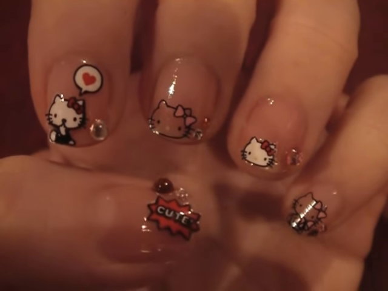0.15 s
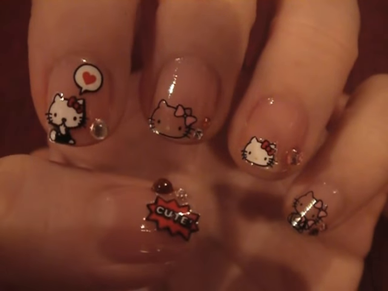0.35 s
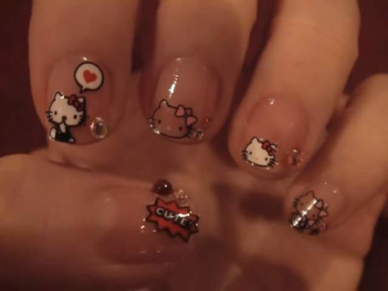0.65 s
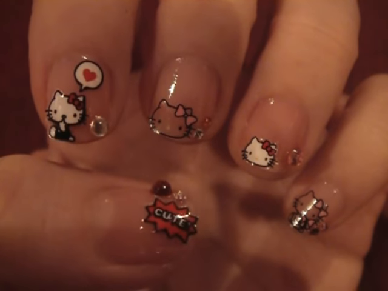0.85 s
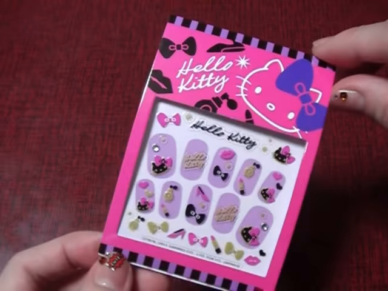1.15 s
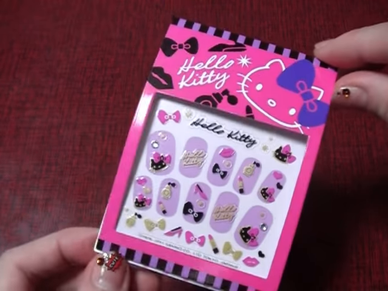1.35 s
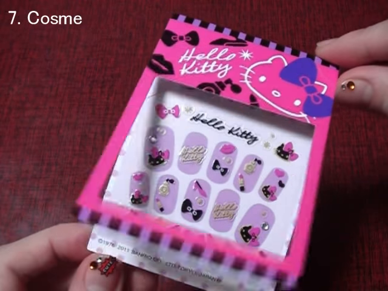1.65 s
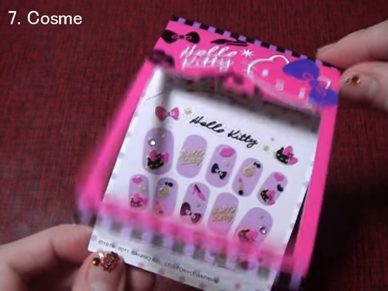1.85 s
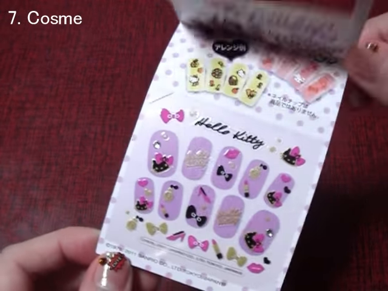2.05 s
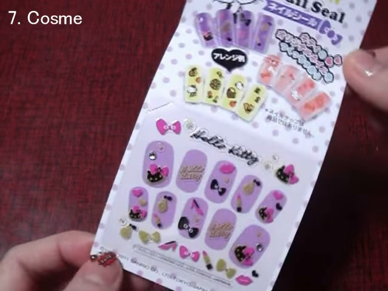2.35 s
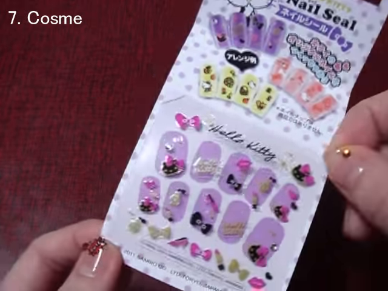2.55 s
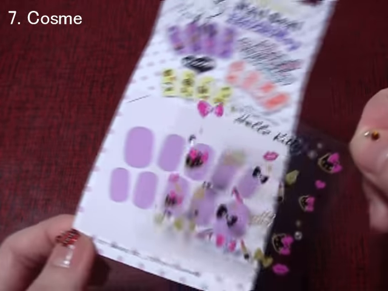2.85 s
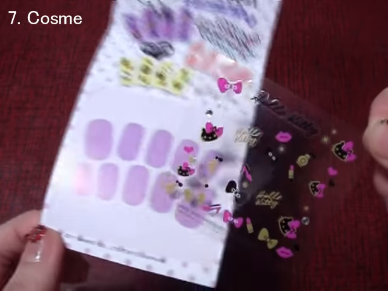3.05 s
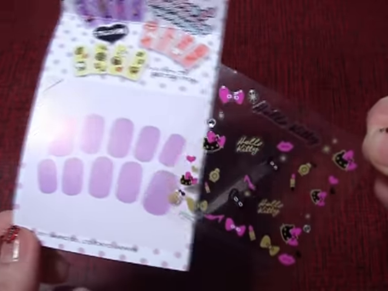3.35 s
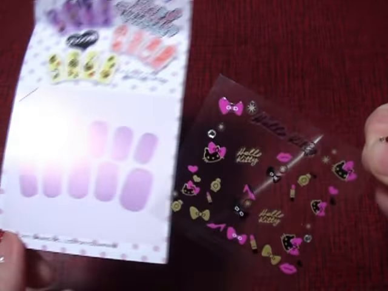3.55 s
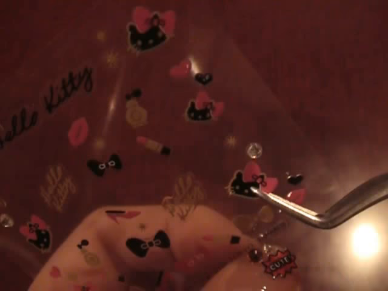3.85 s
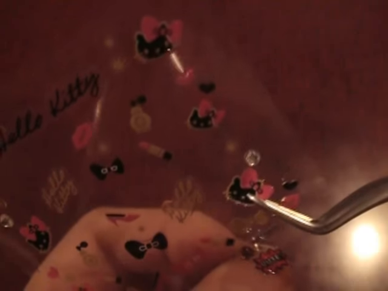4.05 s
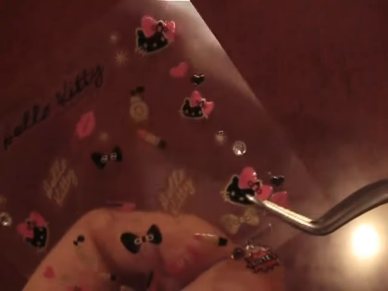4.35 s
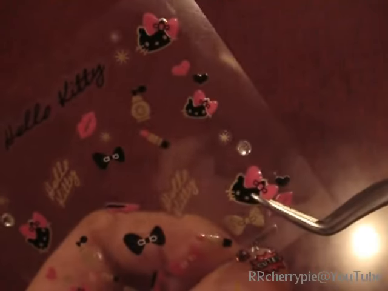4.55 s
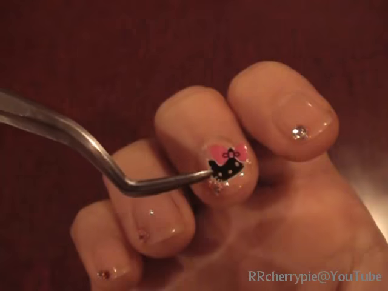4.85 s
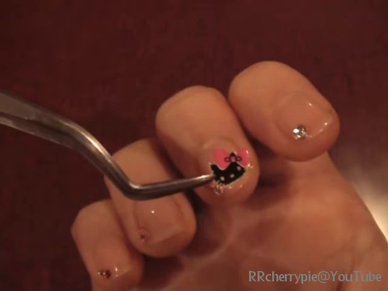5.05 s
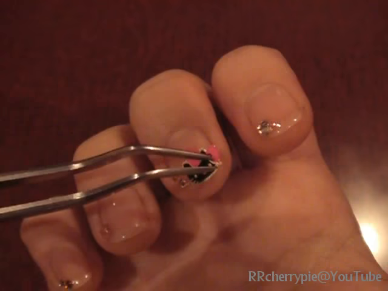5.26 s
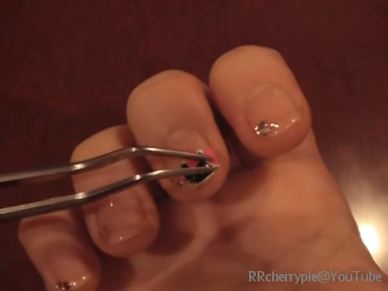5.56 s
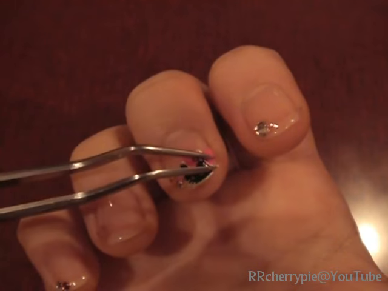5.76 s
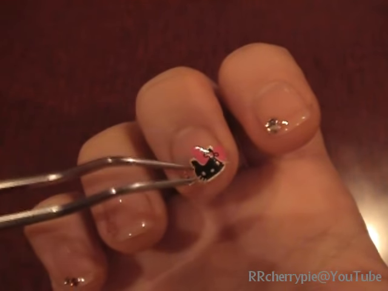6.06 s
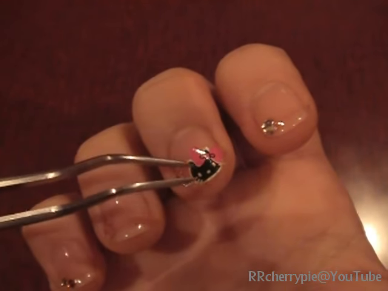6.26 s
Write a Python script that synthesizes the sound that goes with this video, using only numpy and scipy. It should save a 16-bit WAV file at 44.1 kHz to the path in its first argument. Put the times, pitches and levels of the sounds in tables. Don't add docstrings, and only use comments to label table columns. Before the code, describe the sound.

A close, slightly stereo camera microphone in a small room gives constant grainy hiss, a thin steady mid-pitched motor tone and dull knocks about sixty times a second, strong and weak alternating. Until 1.1 s there is little else, just a tiny rub at 0.7. After a very short mute the knocking recedes and a faint lens whine and low hand rumble appear; a soft tick at 1.25, then a card flap drags and slips free at 1.6, with crisp clicks around 1.7. From 2.6 to 3.6 a plastic sheet slides off card: scratchy strokes, crinkles, a sharp tick near 2.77, edge catches near 2.95, thinning out to a tick at 3.78. From 3.84 it is quieter; tweezers touch lightly at 4.39 and 4.43, then at 4.44 a very loud, dry, bright snap flutters out within milliseconds, with a short room tail. More cuts at 4.8 and 5.28, and a barely audible rub at 5.58 before noise continues to 6.5.

```python
import sys
import numpy as np
from scipy import signal
from scipy.fft import rfft, irfft
from scipy.io import wavfile

SR = 44100
rng = np.random.default_rng(int(sys.argv[2]) if len(sys.argv) > 2 else 0)


def to_linear_factor(level_db):
    exponent = np.asarray(level_db, float) / 20
    return 10 ** exponent


def file_out(sig):
    cols = np.atleast_2d(sig).T
    lim = np.clip(cols, -1, 1)
    pcm = np.round(lim * 32767).astype(np.int16)
    wavfile.write(sys.argv[1], SR, pcm)


N = 283122

# start_s, end_s, knock_db, whine_db, rumble_db
SHOTS = [
    (-.01, 1.137, -56, -92, -79),
    (1.159, 2.539, -75, -66, -70),
    (2.564, 3.805, -62.5, -75.5, -69.5),
    (3.839, 4.775, -57.5, -87.5, -78),
    (4.801, 5.275, -57, -88, -63.5),
    (5.281, 6.501, -61.5, -94.5, -72),
]


def at_hz(points, hz):
    points = np.array(points)
    return np.interp(np.log(hz + 1), np.log(points[:, 0]), points[:, 1])


def rms_one(x):
    return x / np.sqrt(np.mean(x ** 2) + 1e-20)


def drift(rate_hz):
    r = np.exp(-40 * np.pi * rate_hz / SR)
    slow = signal.lfilter([1], [1, -2 * r, r * r], rng.standard_normal(N // 20 + 2002))[2000:]
    return np.interp(np.arange(N) / 20, np.arange(len(slow)), rms_one(slow))


def ring(clicks, hz, t60):
    r, w = to_linear_factor(-60 / (t60 * SR)), 2 * np.pi * hz / SR
    return signal.lfilter([0, np.sin(w)], [1, -2 * r * np.cos(w), r * r], clicks + 1e-18)


def resonate(x, hz, width_hz):
    r = np.exp(-np.pi * width_hz / SR)
    poles = [1, -2 * r * np.cos(2 * np.pi * hz / SR), r * r]
    return signal.lfilter([(1 - r * r) / 2, 0, (r * r - 1) / 2], poles, x)


def band_pass(x, order, low_hz, high_hz):
    return signal.sosfilt(signal.butter(order, [low_hz, high_hz], "band", fs=SR, output="sos"), x)


def pan(x, left_db):
    return x * to_linear_factor(np.array([[left_db / 2], [-left_db / 2]]))


def shot_now():
    return np.searchsorted(np.array(SHOTS)[:, 0], np.arange(N) / SR) - 1


def per_shot(column):
    return np.array(SHOTS)[shot_now(), column]


def hiss():
    # pitch_hz, level_db (per Hz)
    hiss_points = [(15, -51.5), (25, -24), (60, -12), (138, -11.5), (171, -10), (205, -13.5), (418, -10.5),
                   (573, -13), (786, -12.5), (851, -8.5), (921, -10), (1170, -16.5), (9840, -29),
                   (12200, -37.5), (13500, -57.5)]
    # pitch_hz, left_minus_right_db
    balance = [(60, -4), (230, -2), (890, -2), (3440, 0.5), (13300, -0.5)]
    hz = np.fft.rfftfreq(N, 1 / SR)
    tilt = to_linear_factor(at_hz(balance, hz) / 2 * np.array([[1], [-1]]))
    noise = irfft(rfft(rng.standard_normal((2, N))) * to_linear_factor(at_hz(hiss_points, hz)) * tilt, N)
    upper = band_pass(noise, 4, 1000, 12000)
    return noise * to_linear_factor(-65) / np.std(upper)


def lens_and_rumble():
    # pitch_hz, width_hz, level_db
    whine_modes = [(1950, 120, -0.5), (2210, 60, -5.5), (2860, 340, 0.5), (3880, 150, -8), (4290, 250, -6),
                   (5220, 280, -7.5), (5940, 220, -5.5), (7050, 200, -13)]
    white = rng.standard_normal((3, N))
    whine = 0
    for hz, width_hz, db in whine_modes:
        narrow = resonate(resonate(white[0], hz, width_hz), hz, width_hz)
        whine = whine + to_linear_factor(db) * rms_one(narrow)
    whine = rms_one(whine) * to_linear_factor(per_shot(column=3) + 0.6 * drift(5.5))
    rumble = rms_one(band_pass(white[1:] + 0.6 * white[0], 2, 90, 300))
    return pan(whine, left_db=-2) + rumble * to_linear_factor(per_shot(column=4) + 1.4 * drift(14))


def motor():
    # multiple_of_tone, level_db (rms)
    harmonics = [(.5, -79), (1, -63), (2, -83.5), (2.5, -86.5)]
    # pitch_hz, level_db (rms)
    gear_lines = [(604, -75), (4190, -85.5), (7881, -97.5), (10068, -96.5), (3915, -87), (120, -82.5),
                  (63.26, -79)]
    tone_hz = 840.7
    t = np.arange(N) / SR
    phase = 2 * np.pi * tone_hz * t + rng.uniform(0, 2 * np.pi, len(SHOTS))[shot_now()]
    tone = sum(to_linear_factor(db) * np.cos(k * phase) for k, db in harmonics) * to_linear_factor(0.99 * drift(9.6))
    gears = 0
    for hz, db in gear_lines:
        waver = to_linear_factor(db - 1.5 + 3.8 * drift(3.5))
        gears = gears + waver * np.sin(2 * np.pi * hz * t + 0.5 * drift(3))
    return pan(tone, left_db=-3) + pan(gears, left_db=0.5)


def drum():
    lags = [0.0096, .0131, 0.0054, .01223, 0.019, 0.022]
    drum_hz, second_head_db = 29.97, -6
    half_turns = np.floor((np.arange(N) / SR - np.array(lags)[shot_now()]) * 2 * drum_hz)
    strikes = np.diff(half_turns, prepend=half_turns[0]) == 1
    uneven_db = 1.5 * rng.standard_normal(N)
    knocks = strikes * to_linear_factor(per_shot(column=2) + second_head_db * (half_turns % 2) + uneven_db)
    dull = ring(knocks, 445, 0.02) + to_linear_factor(-11) * ring(knocks, 210, 0.03)
    tick = ring(knocks, 4600, 0.003)
    return pan(dull, left_db=-9) + tick


def room(x):
    # pitch_hz, t60_s, level_db
    decays = [(150, 0.22, -20), (400, 0.25, -16), (1000, 0.11, -24), (2500, .19, -27), (4940, 0.13, -26.5),
              (9500, 0.17, -28.5)]
    size = SR // 2
    t, tail = np.arange(size) / SR, 0
    late = np.clip(0.45 + (t > 0.0135), 0, 1)
    for hz, t60, db in decays:
        dense = rng.standard_normal((2, size)) + 0.635 * rng.standard_normal(size)
        echoes = rms_one(band_pass(dense, 1, hz / 1.4, hz * 1.9))
        tail = tail + to_linear_factor(db - 20 - 60 * t / t60) * np.sqrt(hz / 5000) * echoes * late
    return signal.fftconvolve(x[None], tail, axes=1)[:, :N]


def slips(per_s, spread_db, clump_db):
    sizes = to_linear_factor(spread_db * np.minimum(rng.exponential(1, N), 5)) * rng.choice([-1, 1], N)
    return sizes * (rng.random(N) < per_s / SR) * to_linear_factor(clump_db * drift(137))


def body(x, modes, patchy_db):
    total = 0
    for k, (hz, width_hz, db) in enumerate(modes):
        bending = to_linear_factor(db + patchy_db * drift(9.8))
        total = total + (-1) ** k * bending * rms_one(resonate(x, hz, width_hz))
    return rms_one(total)


def pressure(start, length, db, swell_db):
    grip_db_per_s, let_go_db_per_s = 1800, 1200
    t = np.arange(N) / SR - start
    edge_db = np.maximum(-t, 0) * grip_db_per_s + np.maximum(t - length, 0) * let_go_db_per_s
    return to_linear_factor(np.maximum(db + swell_db * np.clip(t / length, 0, 1) - edge_db, -200)) ** 2


def rubbing():
    # start_s, length_s, pressure_db, swell_db, card_contact_db
    strokes = [(0.698, 0.019, -64, -1, -1.5), (2.483, 0.087, -75, 10, 0), (2.617, 0.096, -64.5, 16, -8.5),
               (2.714, 0.064, -56.5, 10.5, -7.5), (2.79, 0.027, -61.5, 7, -7),
               (2.834, 0.052, -54.5, -5.5, -4.5), (2.98, 0.088, -54.5, 4, 2),
               (3.063, 0.081, -48.5, -3.5, -4), (3.15, 0.044, -58, -0.5, -2), (3.218, 0.07, -60, 2.5, -0.5),
               (3.304, 0.052, -48.5, -16, -1), (3.374, 0.12, -62.5, 0, -1), (3.498, 0.017, -49.5, -6.5, -3),
               (3.516, 0.051, -58, -1.5, -11), (3.593, .05, -76, 0, -6), (3.673, 0.13, -68, 0, -6),
               (4.583, .035, -67, -5, -3), (5.581, 0.037, -67.5, -9, -2)]
    # start_s, length_s, pressure_db, swell_db
    flap_strokes = [
        (1.588, .034, -70, 13),
        (1.627, 0.014, -43.5, -2),
        (1.706, 0.042, -55, -24),
    ]
    # pitch_hz, width_hz, level_db
    card_modes = [(644, 310, -4.5), (903, 150, 1.5), (1243, 120, -1.5), (1590, 160, -2)]
    mid_modes = [(2370, 330, -1.8), (2660, 140, -1.3), (3450, 500, 1)]
    top_modes = [(4655, 610, 1.5), (6000, 620, 0.5), (6740, 690, 0), (8000, 830, 2), (8500, 520, 3),
                 (10030, 2100, 1.5), (11800, 1700, -12)]
    flap_modes = [(1600, 135, -2), (3000, 900, -6), (3917, 150, -6), (4640, 89, -1.5), (7050, 480, -3),
                  (8730, 370, -0.5), (11060, 400, -15), (12900, 750, -22)]
    power = np.array([pressure(*row[:4]) for row in strokes])
    contact_db = np.array(strokes)[:, 4]
    mid_db = -1.5 + 0.73 * contact_db
    grit = slips(per_s=3500, spread_db=2.5, clump_db=2)
    top = np.sqrt(power.sum(axis=0)) * body(grit, top_modes, 3.2)
    mid = np.sqrt(to_linear_factor(mid_db) ** 2 @ power) * body(grit, mid_modes, 3.4)
    card = np.sqrt(to_linear_factor(contact_db) ** 2 @ power) * body(grit, card_modes, 3.6)
    flap = np.sqrt(sum(pressure(*row) for row in flap_strokes)) * body(grit, flap_modes, 1.7)
    return top + mid + card + flap


def ticks():
    # start_s, level_db (peak), pitch_hz, thud_db (relative), thud_hz
    card_ticks = [(1.2484, -42.5, 5160, 2.5, 1000), (1.2553, -62.5, 3000, 13, 450),
                  (1.7096, -26.5, 4430, -10, 1000), (1.7361, -30, 8400, -19, 1084),
                  (1.7623, -43.5, 4900, 14, 658), (2.7417, -39, 4870, 3, 1490),
                  (2.7746, -22.5, 4600, -17.5, 707), (3.3124, -39, 3300, 0, 930),
                  (3.4616, -50, 4890, 3.5, 960), (3.5057, -41.5, 3480, -3, 950),
                  (3.7824, -39, 5500, -6, 1570)]
    # start_s, level_db (peak), pitch_hz
    catches = [
        (2.9185, -40, 8860),
        (2.944, -37.5, 8000),
        (2.968, -37, 8500),
        (2.9815, -30, 8300),
        (4.385, -25, 4520),
        (4.4253, -32, 4500),
    ]
    # start_s, level_db (peak), pitch_hz
    creases = [(2.691, -43, 7100), (2.711, -33, 7050), (2.7317, -40, 4860), (2.76, -40, 4830),
               (2.8245, -37, 9300), (2.8412, -37.5, 3620), (2.8544, -39, 4940), (2.8758, -40, 2730),
               (3.02, -35, 9000), (3.0276, -32.5, 7950), (3.05, -38, 3460), (3.0686, -40, 5720),
               (3.089, -35, 3880), (3.1109, -37, 5540), (3.251, -42.5, 3450), (3.303, -45, 4400),
               (3.495, -50, 3340), (3.5532, -47, 7990), (3.691, -47.5, 8290)]
    tick_s, catch_s, crease_s = 0.013, 0.0051, 0.018
    catch_thud_db, crease_thud_db, card_thud_hz = -16.5, -18, 1000
    rows = [row + (tick_s,) for row in card_ticks]
    rows += [row + (catch_thud_db, card_thud_hz, catch_s) for row in catches]
    rows += [row + (crease_thud_db, card_thud_hz * rng.uniform(0.74, 1.32), crease_s) for row in creases]

    out, size, lead_s = np.zeros(N), 1500, 0.003
    t = np.arange(size) / SR
    hit = 1.0 * (np.arange(size) == round(lead_s * SR))
    for s, db, hz, thud_db, thud_hz, length in rows:
        decay = np.maximum((lead_s - t) / 0.004, (t - lead_s) / max(length, 0.002))
        burst = rng.standard_normal(size) * to_linear_factor(-60 * decay)
        bright = band_pass(burst, 3, 2600, 10500) + resonate(burst, hz, 600) * to_linear_factor(10.5)
        thud = 0.14 * ring(hit, thud_hz, 0.035)
        thud += resonate(burst, thud_hz, 250) + resonate(burst, 1.2 * thud_hz, 400)
        thud += 0.25 * resonate(np.abs(burst), 0.35 * thud_hz, 130)
        tick = bright / np.abs(bright).max() + to_linear_factor(thud_db) * thud / np.abs(thud).max()
        i = round((s + 0.0005 - lead_s) * SR)
        out[i:i + size] += to_linear_factor(db) * tick
    return out


def snap():
    # pitch_hz, level_db, t60_s
    snap_modes = [(165, -24.5, 0.034), (271, -28, 0.065), (420, -25, 0.04), (739.8, -25, 0.064),
                  (1194, -19.5, .025), (1590, -14.5, 0.012), (2360, -14, 0.0089), (2637.9, -10.5, 0.021),
                  (2920, -15, 0.012), (3331, -13.5, 0.016), (4090, -9.5, 0.012), (4900, -13.5, 0.02),
                  (5735, -14, 0.0083), (6850, -12.5, 0.0042), (8000, -6, 0.0051), (9300, -3.5, 0.003),
                     (10500, -12.5, 0.0022), (11794, -15.5, 0.0014), (12800, -14, 0.0032)]
    modes = snap_modes
    snap_s, snap_db = 4.4431, -0.5
    tear_gap_s, tear_db = 0.0006, -21.5
    flutter_gap_s, flutter_db, flutter_loss_db = 0.00095, -4, 2.88
    wall_echo_s, wall_echo_db, wall_echo_dull_db = 0.0152, -30.5, 3
    dulling_hz, dulling_db_per_s, dullest_db = 4270, 3200, 17.5
    rip_db, rip_s = -12.5, 0.012

    tears, flaps = np.arange(1, 5), np.arange(1, 8)
    flutter_s = flutter_gap_s * (flaps - 0.5 + rng.uniform(-0.3, 0.3, 7))
    after = np.r_[-tear_gap_s * tears, 0, flutter_s, wall_echo_s]
    db = np.r_[tear_db - 1.5 * tears, snap_db, flutter_db - flutter_loss_db * flaps, wall_echo_db]
    loss_db = np.r_[np.minimum(dulling_db_per_s * after[:-1], dullest_db), wall_echo_dull_db]
    scatter = rng.standard_normal((len(after), len(modes), 2))
    strike_at = ((snap_s + after) * SR).astype(int)
    pop = 0
    for k, (hz, level_db, t60) in enumerate(modes):
        octaves = np.log2(hz / dulling_hz)
        common_db = db + level_db + 2.5 * scatter[:, k, 0] - loss_db * max(octaves, -0.3)
        apart_spread_db = 0.37 + 1.3 * np.clip(np.log2(hz / 3000), 0.1, 1)
        apart_db = -0.8 + apart_spread_db * scatter[:, k, 1]
        polarity = np.sign(np.sin(hz))
        clicks = np.zeros((2, N))
        clicks[:, strike_at] = pan(to_linear_factor(common_db)[None], apart_db)[:, 0] * polarity
        pop = pop + ring(clicks, hz, t60)

    t = np.arange(N) / SR - snap_s
    fall_db = np.maximum(rip_db - 60 * t / rip_s, -200) * (t > 0)
    rip = rng.standard_normal(N) * (t > 0) * to_linear_factor(fall_db)
    return pop, band_pass(rip, 1, 400, 9000)


def scene():
    camera = hiss() + lens_and_rumble() + motor() + drum()
    hands = pan(rubbing() + ticks(), left_db=-2.5)
    pop, rip = snap()
    echoes = room((hands + to_linear_factor(-6) * pop).mean(axis=0) + to_linear_factor(8.5) * rip)
    heard = hands + pop + rip + echoes
    mic_low_hz = 130
    heard = signal.sosfilt(signal.butter(2, mic_low_hz, "high", fs=SR, output="sos"), heard)
    return heard + camera


def low_pass(x):
    return signal.sosfilt(signal.butter(12, 13870, fs=SR, output="sos"), x)


def record(dry):
    mic_top_hz, fade_in_s = 13400, 0.00039
    t = np.arange(N) / SR
    gate = sum(np.clip((t - shot[0]) / fade_in_s, 0, 1) * (t < shot[1]) for shot in SHOTS)
    cut = signal.sosfilt(signal.cheby2(12, 30, mic_top_hz, fs=SR, output="sos"), dry)
    muted = cut * np.clip(gate, 0.002, 1)
    return low_pass(np.clip(muted, -1, 1))


dry = scene()
out = record(dry)
file_out(out)
```